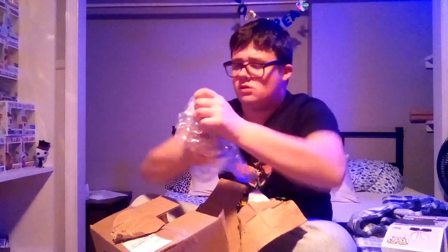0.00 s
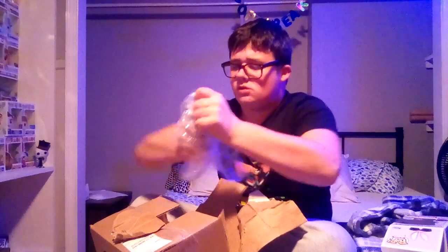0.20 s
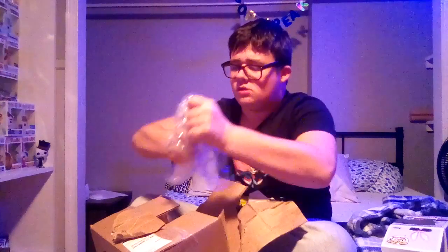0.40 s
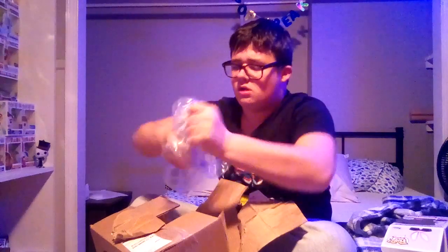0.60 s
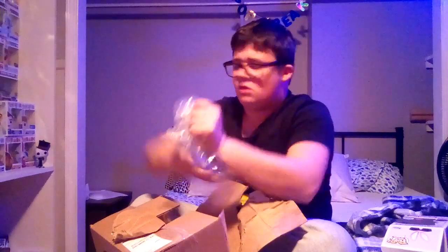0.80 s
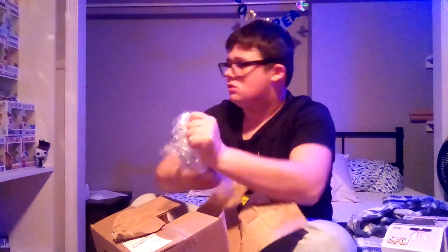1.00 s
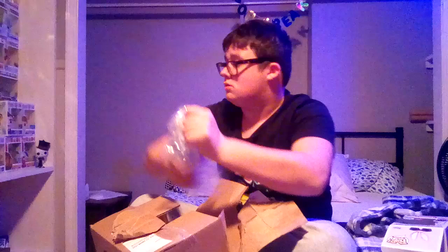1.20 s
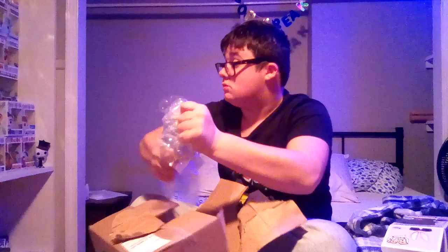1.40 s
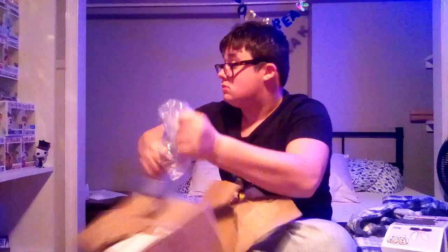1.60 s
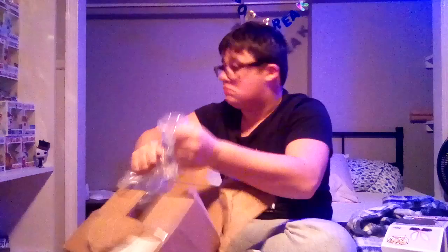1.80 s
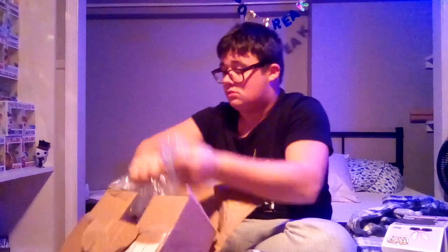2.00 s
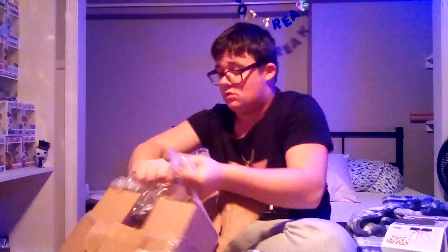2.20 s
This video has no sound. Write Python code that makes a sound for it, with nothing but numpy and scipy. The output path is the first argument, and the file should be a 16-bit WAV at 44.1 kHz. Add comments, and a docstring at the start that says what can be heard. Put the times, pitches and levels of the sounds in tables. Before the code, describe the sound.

Sharp pops of twisted bubble wrap, with crinkling plastic and light cardboard scuffs in a room.

```python
"""Bubble wrap pops as it is twisted by hand over a cardboard box in a small bedroom.
Its bubbles burst in two quick runs of sharp cracks that ring round the room. The plastic film
crinkles, crunches and snaps, and the box is scuffed and bumped, all over a faint hum and hiss.
A limiter turns the sound down at each loud pop, then lets the room's echo swell back."""
import sys
import numpy as np
from scipy import signal
from scipy.fft import rfft, irfft
from scipy.io import wavfile
from scipy.ndimage import uniform_filter1d

SR = 44100
rng = np.random.default_rng(int(sys.argv[2]) if len(sys.argv) > 2 else 0)


def transcribe(u):
    """Save the signal u as a 16-bit wav file named by the first command-line argument.

    u: samples, shape (n,) or (channels, n), limited to [-1, 1]; the rate is SR.
    q: integer samples, one column per channel.
    """
    v = np.clip(np.atleast_2d(u).T, -1, 1)
    q = np.round(v * 32767).astype(np.int16)
    wavfile.write(sys.argv[1], SR, q)


N = 105840
T = np.arange(N) / SR


# The tone of a burst, as the microphone colours it: pitch_hz, relative_db
BURST_TONE = [(40, -58), (100, -51), (200, -32), (450, -11.5), (800, 1.5), (1400, 2.5), (2600, 3),
              (4000, 0), (6400, -4), (8000, -17.5), (13000, -22), (15400, -5), (17000, -21)]
# One row per bursting bubble: start_s, level_db, crack_db, air_pocket_hz, air_pocket_db,
# film_hz, film_db, treble_edge_hz, thump_db, early_echo_db
BUBBLE_POPS = [(0.2199, 25, -6.5, 890, -35, 2550, -19.5, 4430, -20, -3.5),
               (.3436, 26, -2, 900, -26, 2700, -15.5, 3340, -25, -6),
               (0.4203, 25, -2.5, 1030, -30, 2370, -11.5, 3160, -25, -4.5),
               (1.3747, 30.5, 3.5, 820, -20.5, 2480, -24, 5000, -16.5, -5),
               (1.5990, 20.5, -3.5, 1040, -36, 2460, -15.5, 2470, -25.5, -5),
               (1.6645, 29, -2.5, 810, -17.5, 2380, -5.5, 2600, -23.5, -8.5),
               (1.7798, 19.5, -3, 765, -12, 1860, -1.5, 1670, -21.5, -14),
               (2.0329, 22.5, 0, 740, -18.5, 2700, -10.5, 2830, -18.5, -3.5)]

def pops():
    """A bubble bursts: the jump in pressure rings the torn film and the air between the hands."""
    out, tone = np.zeros(N), colour(BURST_TONE)
    thump = knock(hz=220, fade_s=0.018, edge_hz=500)
    for (start_s, level_db, crack_db, pocket_hz, pocket_db,
         film_hz, film_db, edge_hz, thump_db, early_db) in BUBBLE_POPS:
        jump = from_db(film_db) * ring(film_hz, fade_s=0.0019)
        # A brief high ring brightens the crack.
        jump += from_db(film_db - 15.5) * ring(3.48 * film_hz, fade_s=0.002)
        jump += from_db(pocket_db) * ring(pocket_hz, fade_s=0.0039)
        jump[0] += 1  # the pressure jump itself
        smoothing = np.exp(-2 * np.pi * edge_hz / SR)  # softens the treble
        crack = signal.lfilter([1], [1, -smoothing], through(jump, tone))
        pop = unit(crack) + from_db(thump_db) * thump
        path = room(direct_db=crack_db, early_db=early_db)
        path += from_db(crack_db + 2) * scatter(fade_s=0.015)  # inside the wad and between the hands
        add(out, start_s, from_db(level_db) * through(pop, path))
    return out


# Deep thuds: start_s, level_db
LOW_THUDS = [(1.376, 5), (1.4712, -6)]

def low_thuds():
    """A deep, soft thud under the loudest cracks."""
    out = np.zeros(N)
    thud = unit(lowpass(ring(hz=50, fade_s=0.017), hz=220))
    for start_s, level_db in LOW_THUDS:
        add(out, start_s, from_db(level_db) * thud)
    return out


# The tone of the crinkling, as the microphone colours it: pitch_hz, relative_db
CRINKLE_TONE = [(150, -33), (500, -16.5), (900, -3), (1600, -1), (3000, 2.5), (4500, -2), (6400, -4.5),
                (8200, -23.5), (13500, -30), (15400, -9.5), (16500, -28)]
# How loudly the twisted film crinkles: time_s, level_db
CRINKLE_LEVELS = [(0, -26.5), (.07, -34), (.16, -34), (.3, -33), (.58, -35.5), (.66, -32), (.70, -29),
                  (.745, -31.5), (.80, -34), (.89, -33), (.94, -35.5), (1.03, -29), (1.10, -33.5),
                  (1.16, -36), (1.22, -35.5), (1.26, -36), (1.31, -39), (1.36, -33.5), (1.5, -30.5),
                  (1.58, -37.5), (1.7, -34), (1.93, -40), (2.2, -42), (2.33, -43), (2.38, -34.5),
                  (2.4, -51)]
# Folds that collapse: peak_s, level_db, half_width_s
FOLD_CRUNCHES = [(.656, -40, 0.0091), (0.734, -25.5, .008), (1.4760, -9, 0.0029)]

def crinkles():
    """Twisted film gives thousands of tiny clicks; a collapsing fold adds a short crunch of noise."""
    clicks = random_clicks(CRINKLE_LEVELS, per_s=4000, spread_db=4)
    crinkle = from_many_spots(clicks, echo_db=-2, spots=8)
    collapse = sum(from_db(level_db) * np.exp(-np.abs(T - peak_s) / half_width_s)
                   for peak_s, level_db, half_width_s in FOLD_CRUNCHES)
    crunch = from_many_spots(collapse * rng.standard_normal(N), echo_db=-11, spots=2)
    return through(crinkle + crunch, colour(CRINKLE_TONE))


# Creases that snap: start_s, level_db, pitch_hz
CREASE_SNAPS = [(0.1277, -11, 2780), (0.194, -9, 2840), (0.6493, -3, 1390), (.7330, -8, 2860),
                (1.095, -12, 3220), (1.1058, -8, 3160), (1.1301, -3, 2840), (1.1415, -4, 2240),
                (1.1748, -7.5, 2240), (1.2028, -7.5, 3980), (1.22, -7.5, 1620), (1.3105, -13.5, 3040),
                (1.4732, 9, 2170), (2.2316, -14, 2400)]

def snaps():
    """A crease flips over and the film rings for an instant."""
    out, tone = np.zeros(N), colour(CRINKLE_TONE)
    for start_s, level_db, pitch_hz in CREASE_SNAPS:
        snap = unit(through(ring(pitch_hz, fade_s=0.0032), tone))
        add(out, start_s, from_db(level_db) * through(snap, room(echo_db=-9.5)))
    return out


# The tone of rubbed cardboard: pitch_hz, relative_db
CARDBOARD_TONE = [(30, -24), (80, -15.5), (160, -6.5), (230, -8.5), (320, 1.5), (520, -6), (900, -3),
                  (1600, -14), (4000, -38)]
# How loud the scuffing is: time_s, level_db
SCUFF_LEVELS = [(0, -47), (.12, -58.5), (.42, -55), (.55, -55), (.65, -41), (.69, -42), (.75, -41),
                (.84, -51.5), (.99, -40), (1.10, -51.5), (1.26, -63.5), (1.42, -44), (1.56, -47.5),
                (1.85, -43), (2.0, -49.5), (2.2, -52.5), (2.39, -42.5)]

def box_scuffs():
    """Cardboard scuffs under the arms in a stream of small, dull clicks."""
    clicks = random_clicks(SCUFF_LEVELS, per_s=560, spread_db=1.5)
    return through(from_many_spots(clicks, echo_db=-8, spots=2), colour(CARDBOARD_TONE))


# Bumps on the box: start_s, level_db, pitch_hz, fade_s
BOX_BUMPS = [(0.6489, -3.5, 900, 0.0043), (0.732, -6, 864, 0.0031), (.9790, -9, 985, 0.02),
             (1.31, -19, 800, 0.081), (1.4723, 9, 217, 0.023), (1.4734, 7.5, 970, 0.012),
             (1.54, -5, 790, 0.016), (1.541, -7, 290, 0.021), (1.9920, 1, 506, 0.007)]

def box_bumps():
    """Bumped cardboard rings briefly with a dull knock."""
    out = np.zeros(N)
    for start_s, level_db, pitch_hz, fade_s in BOX_BUMPS:
        bump = knock(pitch_hz, fade_s, edge_hz=1500)
        add(out, start_s, from_db(level_db) * through(bump, room(echo_db=-10.5)))
    return out


# The room's lingering echo, band by band: pitch_hz, relative_db, fade_s
ECHO_BANDS = [(156, -28, 0.64), (402, -2.5, 0.23), (900, 0.5, 0.24), (1850, 1.5, 0.3), (3750, 4, 0.28),
              (8000, 1, 0.23), (14800, 0, 0.18)]
# Notes at which the room rings: pitch_hz, relative_db, fade_s
ROOM_NOTES = [(235.7, -53.5, 0.12), (530, -52, 0.17), (701, -57.5, 0.23), (869, -46.5, 0.1),
              (1020, -59, 0.1), (1172, -48.5, 0.18)]

def room(direct_db=0, early_db=0, echo_db=0):
    """A click arrives directly, then bounces off furniture, lingers and rings the room's notes."""
    t = T[:SR // 2]
    spectrum = rfft(rng.standard_normal(len(t)))
    log_hz = np.log(np.fft.rfftfreq(len(t), 1 / SR) + 1)
    centres = np.log([band[0] for band in ECHO_BANDS])
    tail = np.zeros(len(t))
    for (_, db, fade_s), share in zip(ECHO_BANDS, np.eye(len(centres))):
        band_noise = irfft(spectrum * np.interp(log_hz, centres, share), len(t))
        tail += from_db(db) * decay(fade_s) * band_noise
    build_up = 1 - np.exp(-t / 0.0059)
    tail *= from_db(-3.5) * build_up / np.sqrt(SR * .02)
    early = from_db(5.5 + early_db) * scatter(fade_s=0.077)
    notes = sum(from_db(db) * ring(hz, fade_s) for hz, db, fade_s in ROOM_NOTES)
    path = from_db(echo_db) * delayed(early + tail + notes, delay_s=0.0046)  # to the wall and back
    path[0] += from_db(direct_db)
    return path


# The tone of the quiet room: pitch_hz, relative_db
BACKGROUND_TONE = [(25, -46), (60, -3), (140, 16.5), (300, 1), (1000, -30.5), (4000, -39), (9000, -85),
                   (13500, -1), (15400, -3), (17000, -48)]

def background(level_db=-64.5):
    """Steady, faint noise: a low hum and a thin, high hiss."""
    return from_db(level_db) * through(rng.standard_normal(N), colour(BACKGROUND_TONE))


def random_clicks(levels, per_s, spread_db, clump_db=3):
    """Random clicks of uneven size, louder in brief clumps, following a level curve."""
    clumps = np.interp(T, np.linspace(0, T[-1], num=400), rng.standard_normal(size=400))
    sizes = from_db(spread_db * np.minimum(rng.exponential(1, N), 5) + clump_db * clumps)
    clicks = sizes * rng.choice([-1, 1], N) * (rng.random(N) < per_s / SR)
    loudness = from_db(np.interp(T, *np.transpose(levels)))
    return unit(clicks) * np.sqrt(N) * loudness


def from_many_spots(clicks, echo_db, spots):
    """Clicks come from several spots, each with its own path through the room."""
    spot = rng.integers(0, spots, N)
    return sum(through(clicks * (spot == k), unit(room(echo_db=echo_db))) for k in range(spots))


def knock(hz, fade_s, edge_hz):
    """A dull ring, cut above edge_hz and far below its pitch; energy 1."""
    bass_cut = signal.butter(2, hz / 2, "high", fs=SR, output="sos")
    return unit(lowpass(signal.sosfilt(bass_cut, ring(hz, fade_s) + 1e-18), edge_hz))


def scatter(fade_s):
    """Many tiny echoes blur into fading noise; energy 1."""
    return unit(rng.standard_normal(SR // 2) * decay(fade_s))


def ring(hz, fade_s):
    """A fading note of height 1, set off by a click."""
    return np.cos(2 * np.pi * hz * T[:SR // 2]) * decay(fade_s)


def decay(fade_s):
    """A half-second fade that drops 60 dB every fade_s seconds."""
    return np.exp(-np.log(1000) * T[:SR // 2] / fade_s)


def colour(tone, size=4096):
    """Turn a tone table into a click with that tone; energy 1."""
    hz, db = np.transpose(tone)
    log_hz = np.log(np.fft.rfftfreq(size, 1 / SR) + 1)
    gains = from_db(np.interp(log_hz, np.log(hz), db))
    cepstrum = irfft(np.log(gains))
    # Pack the energy at the start, so the click stays sharp (minimum phase).
    cepstrum[1:size // 2] *= 2
    cepstrum[size // 2 + 1:] = 0
    return unit(irfft(np.exp(rfft(cepstrum)))[:size // 2])


def lowpass(x, hz):
    """Turn down everything above hz."""
    return signal.sosfilt(signal.butter(2, hz, fs=SR, output="sos"), x + 1e-18)


def through(x, response):
    """Give x a tone or an echo (convolution), keeping its length."""
    return signal.fftconvolve(x, response)[:len(x)]


def delayed(x, delay_s):
    """The same sound, later."""
    return np.pad(x, (int(delay_s * SR), 0))[:len(x)]


def add(out, start_s, x):
    """Mix x into out at start_s."""
    i = int(start_s * SR)
    out[i:i + len(x)] += x[:N - i]


def unit(x):
    """Scale to energy 1."""
    return x / np.sqrt(np.sum(x ** 2) + 1e-20)


def from_db(db):
    """Turn decibels into a multiplier."""
    return 10 ** (np.asarray(db) / 20)


def scene():
    """Bubble wrap and box over the quiet room, in one channel."""
    quiet_room = background()
    wrap = pops() + low_thuds() + crinkles() + snaps()
    box = box_scuffs() + box_bumps()
    return (wrap + box + quiet_room)[None]


def record(dry, limit_db=-12, deepest_dip_db=22, recovery_db_per_s=137, clip_level=.7, top_hz=17000):
    """A limiter dips just before loud peaks and recovers steadily; what still sticks out overloads."""
    average_s, look_ahead_s = 0.0049, 0.0066
    power = uniform_filter1d(dry[0] ** 2, int(average_s * SR))
    level_db = 10 * np.log10(np.abs(power) + 1e-12)
    excess_db = np.clip(level_db - limit_db, 0, deepest_dip_db)
    recovery_db = recovery_db_per_s * T
    dip_db = np.maximum.accumulate(excess_db + recovery_db) - recovery_db
    dip_db = uniform_filter1d(np.interp(T + look_ahead_s, T, dip_db), size=64)
    drive = dry * from_db(-dip_db) / clip_level
    rounded = clip_level * drive / (1 + drive ** 16) ** (1 / 16)
    treble_cut = signal.cheby2(14, 60, top_hz, fs=SR, output="sos")
    return signal.sosfilt(treble_cut, rounded)


dry = scene()
out = record(dry)
transcribe(out)
```